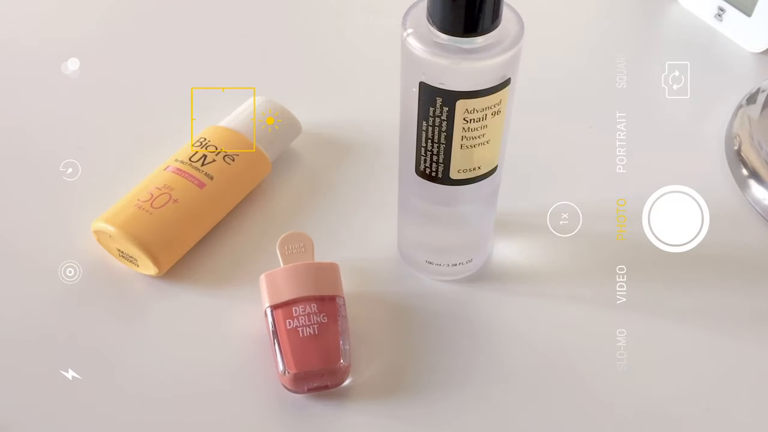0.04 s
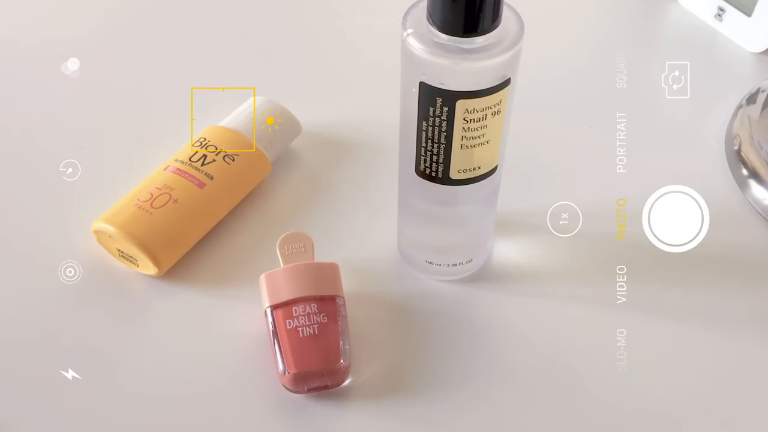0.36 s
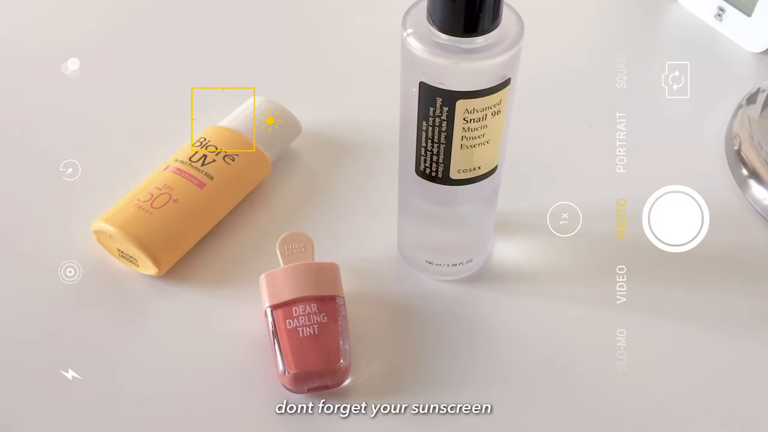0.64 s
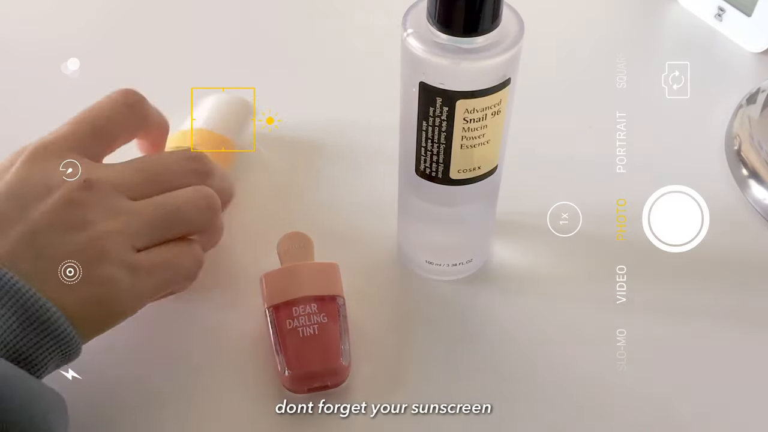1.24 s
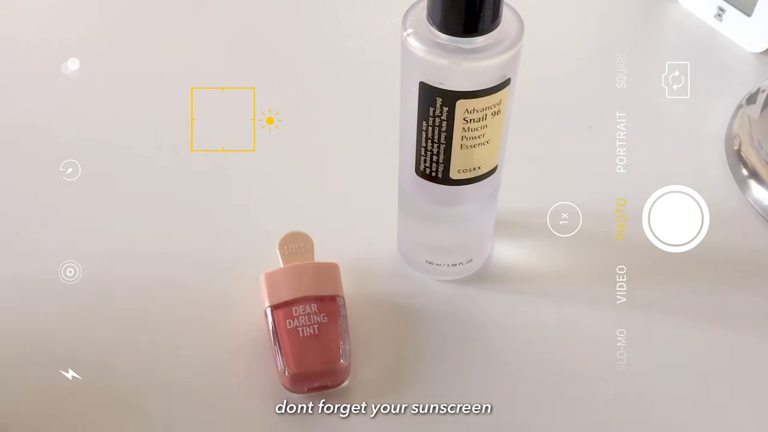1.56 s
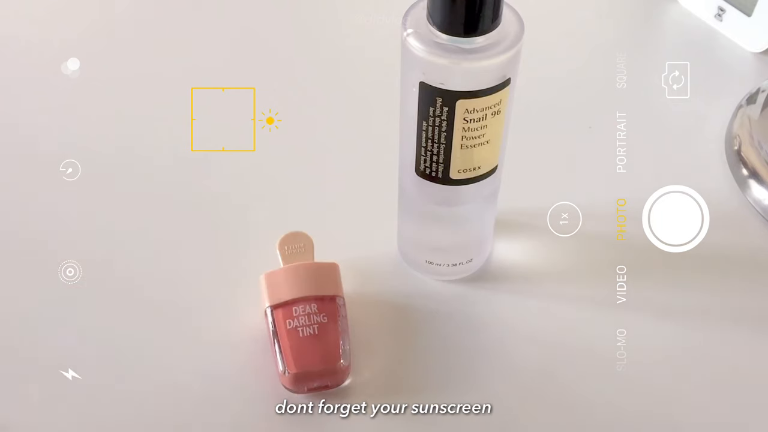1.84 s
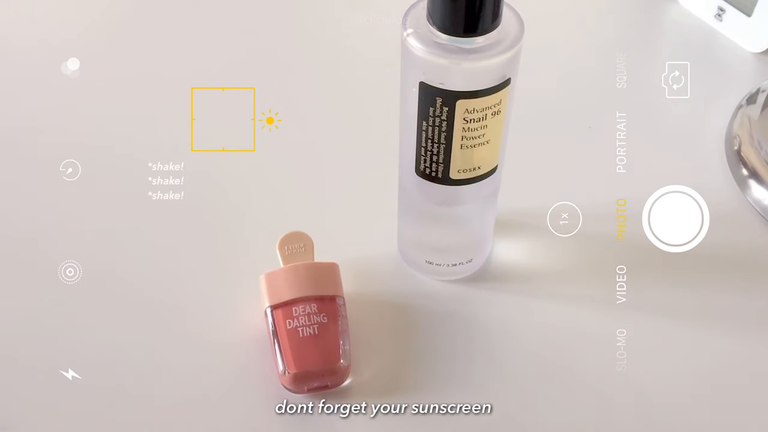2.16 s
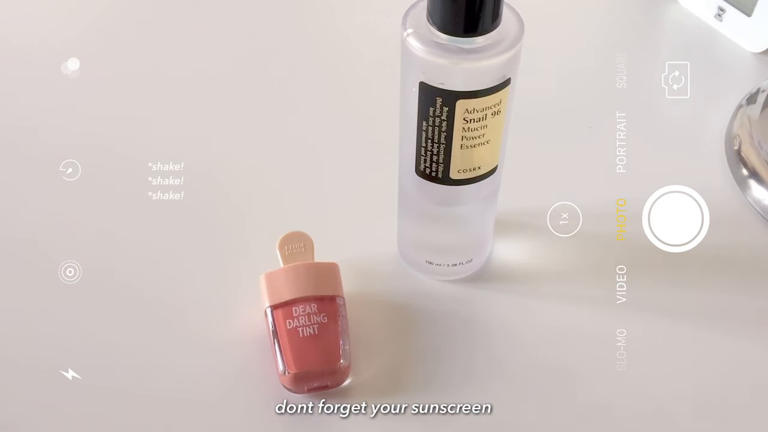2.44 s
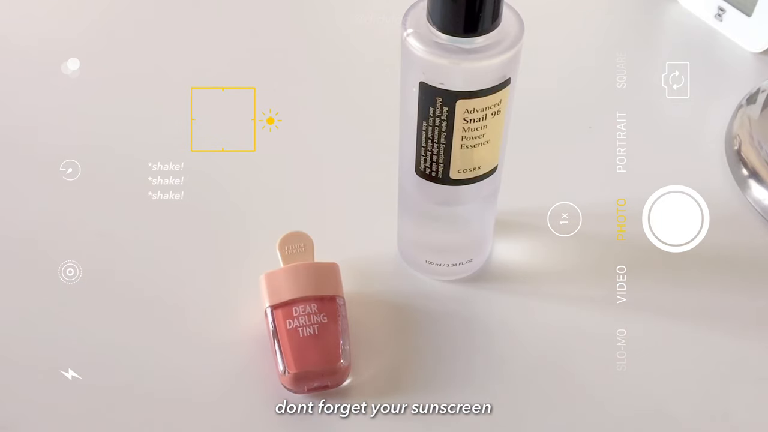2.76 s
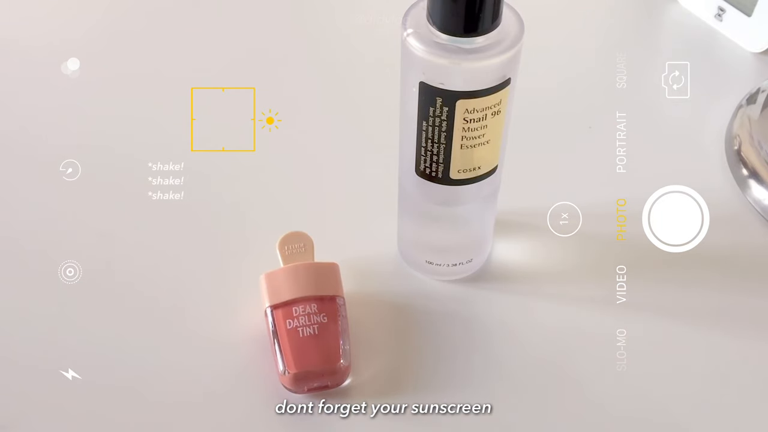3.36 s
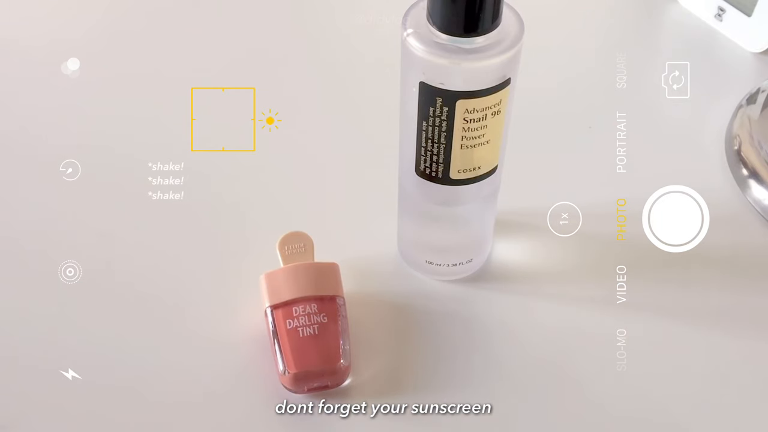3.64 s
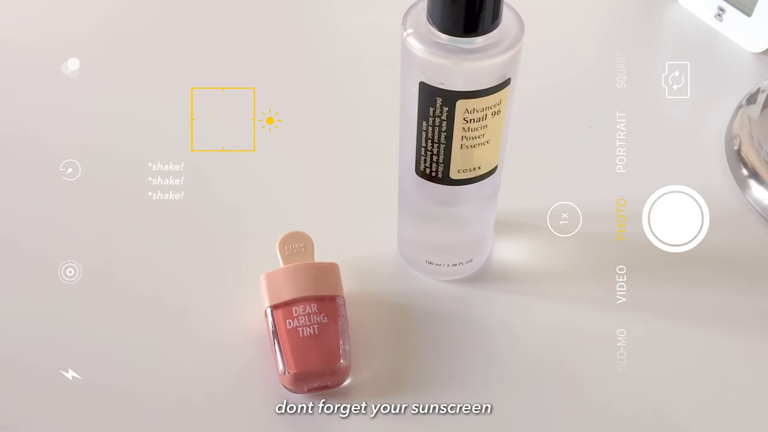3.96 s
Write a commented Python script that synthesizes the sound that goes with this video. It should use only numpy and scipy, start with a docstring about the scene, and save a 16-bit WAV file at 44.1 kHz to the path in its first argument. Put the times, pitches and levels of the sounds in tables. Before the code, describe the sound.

A mixing ball clicks sharply back and forth inside a shaken plastic lotion bottle, heard close in a small, quiet room. Soft cloth rustles and a light tabletop knock come first, and a faint low rumble rises behind the shaking.

```python
"""A small plastic bottle, shaken about five times a second after being lifted off a table.
A mixing ball inside strikes cap and base in turn and grazes the wall between; each blow
briefly rings the stiff shell. Lotion swishes, a sleeve rustles and the quiet room answers.
A wide low rumble fades in behind the shaking."""
import sys
import numpy as np
from scipy import signal
from scipy.fft import rfft, irfft
from scipy.io import wavfile
from scipy.ndimage import uniform_filter1d

SR = 44100
rng = np.random.default_rng(int(sys.argv[2]) if len(sys.argv) > 2 else 0)


def log_audio(samples):
    """Write samples as a 16-bit WAV file to the path given in sys.argv[1]."""
    # one column per channel
    frames = np.atleast_2d(samples).T
    # limit to full scale, then quantise
    limited = np.clip(frames, -1, 1)
    pcm = np.round(limited * 32767).astype(np.int16)
    wavfile.write(sys.argv[1], SR, pcm)


N = 176400


# Shell modes. Each row: frequency in Hz, t60 in seconds, cap-struck gain in dB, base-struck gain in dB.
SHELL_MODES = [(590, .014, -50, -34), (780, .01, -44, -36), (1010, .016, -35, -34), (1240, .024, -24, -22),
               (1680, .007, -20, -18), (1900, .008, -22, -29), (2150, .008, -26, -14),
               (2290, .008, -19, -20), (2680, .005, -10, -25), (3080, .006, -18, -25),
               (3430, .006, -28, -19), (4150, .004, -18, -23), (5400, .003, -15, -21),
               (8800, .002, -20, -19)]
# Contact crack spectrum. Each row: frequency in Hz, gain in dB.
CRACK_SPECTRUM = [(200, -8), (600, -16), (1500, -5), (3500, 0), (6500, 1), (9600, -1), (10400, -10),
                  (11400, -3), (13500, -8), (16000, -11)]

def shell_blow(end, detune=0.024, scatter_db=3.65, spread_s=0.00041, contact_s=0.0006):
    """One unit-energy blow: a crack plus short shell modes. end runs from 0 (cap) to 1 (base)."""
    t = np.arange(SR // 20) / SR
    hz, t60, cap_db, base_db = np.array(SHELL_MODES).T[:, :, None]
    pitch_draw, gain_draw = rng.standard_normal((2, len(SHELL_MODES), 1))
    age = np.maximum(t - spread_s * rng.random((len(SHELL_MODES), 1)), 0)
    gain = amp(cap_db + end * (base_db - cap_db) + scatter_db * gain_draw)
    ring = (gain * fade(age, t60) * np.sin(2 * np.pi * hz * (1 + detune * pitch_draw) * age)).sum(0)
    crack = amp(-21.5 + 6.5 * end) * noise(CRACK_SPECTRUM, len(t)) * fade(t, t60=0.0083)
    attack = 1 - np.exp(-t / contact_s)
    blow = np.pad((ring + crack) * attack, (SR // 1000, 0))
    # The small shell radiates little bass.
    blow = signal.sosfilt(signal.butter(2, 800, "highpass", fs=SR, output="sos"), blow)
    return blow / np.linalg.norm(blow)


# Ball strikes. Each row: start in seconds, level in dB, end (0 cap to 1 base), body in dB, treble in dB.
STRIKES = [(1.877, 4, 0.63, -1.5, 8.5), (2.0117, -1.5, 0.13, 5.3, 11), (2.1034, 7, 0.73, -8, 4),
           (2.2153, 9.9, 0.098, -4.2, -0.5), (2.3116, 8, 1, -6, -8), (2.428, 5.5, 0.16, -3.5, 5),
           (2.5154, 9, 1, -5, -7), (2.6267, 9.5, 0, -4.5, 0), (2.7067, 10, 0.74, -8, -7.2),
           (2.7957, 4, 0.36, -3.5, -9.5), (2.8202, 8, 0.61, -0.5, -7), (2.9118, 7.0, 1, 2.5, 2.5),
           (3.0258, 3.5, 0.19, -2.3, 4.5), (3.1142, 10, 0.42, -6.8, -2.5), (3.2298, 10, 0, -16.5, 0.5),
           (3.309, 7.5, 1, 1.5, -0.5), (3.429, 4.5, 0, -2.5, 4), (3.5168, 8, 0.74, -4, -4.2),
           (3.6294, 9.5, 0.16, -11, -0.8), (3.71, 8.5, 1, -2.8, -1.9), (3.8327, 9.5, 0.11, -7, 1),
           (3.91, 9, 1, 1.5, -3)]
# Room echo spectrum of a strike. Each row: frequency in Hz, gain in dB.
ECHO_SPECTRUM = [(150, -9), (400, -11.5), (600, -10.5), (1000, -8.5), (1250, 0), (1550, -3), (2300, 4),
                 (3000, 1), (4000, -3.5), (6500, -5), (9000, -11.5), (10500, -16.5), (12500, -18),
                 (16000, -34)]
# Lingering tones. Each row: frequency in Hz, t60 in seconds, cap gain in dB, base gain in dB.
LINGERING_TONES = [(1250, .4, -54, -48), (2270, .35, -56, -55)]

def ball_strikes(lead_s=0.00116, direct_db=3.0, echo_db=-36.5, body_hz=1500):
    """The ball hits cap and base in turn: a hard click, the room's echo, two faint lingering tones."""
    out, t = np.zeros(N), np.arange(SR // 3) / SR
    for start, db, end, body_db, treble_db in STRIKES:
        click = shell_blow(end)
        click = click + (amp(body_db) - 1) * lowpass(click, body_hz)
        add(out, start - lead_s, amp(db + direct_db) * treble_shelf(click, treble_db))
        tones = sum(amp(cap_db + end * (base_db - cap_db)) * fade(t, t60) * np.sin(2 * np.pi * hz * t)
                    for hz, t60, cap_db, base_db in LINGERING_TONES)
        echo = amp(echo_db) * treble_shelf(room_tail(ECHO_SPECTRUM), treble_db)
        add(out, start, amp(db) * (echo + tones))
    return out


# Wall grazes. Each row: start in seconds, level in dB, centre in Hz.
WALL_GRAZES = [(1.89, -5.5, 830), (1.988, -15, 1600), (2.037, -10, 1320), (2.066, -13.5, 1350),
               (2.192, -24, 805), (2.261, -20, 1600), (2.394, -13, 1050), (2.844, -5, 2830),
               (2.868, -10, 1600), (2.985, -16, 1330), (3.045, -18, 1200), (3.077, -5.5, 1580),
               (3.189, -15.5, 6240), (3.214, -18, 2380), (3.44, -0.5, 1470), (3.461, -12, 4640),
               (3.481, -9, 1500), (3.615, -22, 2200), (3.688, -20, 5000), (3.800, -5, 2110),
               (3.977, -36, 6000), (3.9985, -5.5, 1910)]

def ball_grazes(lead_s=0.001186, gain_db=3, broadband_db=-15):
    """Between strikes the ball touches the wall with small, narrower-band ticks."""
    out = np.zeros(N)
    for start, db, hz in WALL_GRAZES:
        blow = shell_blow(end=0.32)
        tick = bandpass(blow, hz, q=2.2) + amp(broadband_db) * blow
        add(out, start - lead_s, amp(db + gain_db) * room(tick / np.linalg.norm(tick)))
    return out


# Lotion spectrum. Each row: frequency in Hz, gain in dB.
LOTION_SPECTRUM = [(200, -1), (500, 2), (1300, -2), (2400, 0), (5000, 6), (9000, 0), (16000, -12)]

def lotion(t, start_s=1.94, rise_s=0.033, level_db=-52, wander_db=5.5):
    """Lotion swishes unevenly once the shaking is under way."""
    onset = np.clip((t - start_s) / rise_s, 0, 1)
    return amp(level_db + wander_db * wander(rate_hz=40)) * onset * noise(LOTION_SPECTRUM)


# Lift-off knocks. Each row: start in seconds, ring level in dB, tick level in dB.
LIFT_KNOCKS = [(1.392, -41, -30.5), (1.409, -35.5, -55)]
# Tabletop modes. Each row: frequency in Hz, t60 in seconds, gain in dB.
TABLE_MODES = [(148, 0.065, 2), (256, 0.19, -5), (306, 0.18, -6), (493, 0.039, -2), (657, 0.062, -7),
               (980, 0.04, -9.5), (1680, 0.067, -16)]

def table_knocks(tick_t60_s=0.0076):
    """The bottle knocks the table as it lifts: a tick and the ring of the tabletop."""
    out, t = np.zeros(N), np.arange(SR // 4) / SR
    for start, ring_db, tick_db in LIFT_KNOCKS:
        ring = sum(amp(db) * fade(t, t60) * np.sin(2 * np.pi * hz * t) * rng.choice([-1, 1])
                   for hz, t60, db in TABLE_MODES)
        tick = noise([(500, -10), (1500, 0.5), (4000, -9), (16000, -11.5)], len(t)) * fade(t, tick_t60_s)
        add(out, start, amp(ring_db) * ring + amp(tick_db) * tick)
    return out


# Scuffs. Each row: centre in seconds, half length in seconds, level in dB, resonance in Hz.
FINGER_SCUFFS = [(1.326, 0.0033, -46, 1110), (1.383, 0.019, -63, 1300), (1.785, 0.017, -55, 1640)]

def finger_scuffs(t, relative_bandwidth=0.22, hiss_db=-7):
    """Fingers rub the plastic: brief friction noise with one resonance."""
    out = np.zeros(N)
    for centre, half_length, db, hz in FINGER_SCUFFS:
        rub = noise([(300, 8), (1800, -11), (5000, -12), (16000, -24)])
        body = bandpass(rub, hz, q=1 / relative_bandwidth)
        out += amp(db) * swell(t, centre, half_length) * (body / body.std() + amp(hiss_db) * rub)
    return out


# Rustles. Each row: peak in seconds, rise in seconds, fall in seconds, level in dB.
SLEEVE_RUSTLES = [(0.175, 0.0016, 0.0032, -56), (0.437, 0.022, 0.036, -60), (.63, 0.043, 0.1, -70),
                  (0.841, 0.078, 0.022, -59), (1.255, .004, 0.0055, -67), (1.375, 0.059, 0.051, -54.5),
                  (1.785, 0.023, 0.013, -66), (1.79, .002, 0.002, -46)]
# Cloth spectrum. Each row: frequency in Hz, gain in dB.
CLOTH_SPECTRUM = [(1000, -14), (3000, -15), (5000, -12.5), (8000, -2.5), (10300, -9.5), (12500, -3),
                  (16000, -14)]

def sleeve(t, grain_db=4.0):
    """Cloth rustles in soft, grainy swells."""
    envelope = sum(amp(db) * np.exp(-((t - peak) / np.where(t < peak, rise, fall)) ** 2)
                   for peak, rise, fall, db in SLEEVE_RUSTLES)
    return envelope * amp(grain_db * wander(rate_hz=320)) * noise(CLOTH_SPECTRUM)


# Bumps. Each row: centre in seconds, half length in seconds, level in dB.
HANDLING_BUMPS = [(0.377, 0.021, -41), (0.68, 0.034, -50)]

def handling_bumps(t):
    """Handling makes two soft, low bumps."""
    envelope = sum(amp(db) * swell(t, centre, half_length) for centre, half_length, db in HANDLING_BUMPS)
    return envelope * noise([(20, -29), (60, 6), (130, -12), (300, -38), (1000, -60)])


# Room spectrum for the softer sounds. Each row: frequency in Hz, gain in dB.
ROOM_SPECTRUM = [(150, 24), (1200, 15.5), (2400, 19), (7000, -1.5), (16000, 18.5)]

def room(x, wet_db=-17.5):
    """Direct sound plus the room's answer."""
    tail = room_tail(ROOM_SPECTRUM)
    direct = np.arange(len(tail)) == 0
    return signal.fftconvolve(x, direct + amp(wet_db) * tail / np.linalg.norm(tail))


def room_tail(spectrum, low_t60_s=0.27, treble_t60_s=0.18, delay_s=0.004, build_s=0.0042):
    """Diffuse decay of a small room; the treble dies sooner."""
    t = np.arange(SR // 3) / SR
    diffuse = noise(spectrum, len(t))
    low = lowpass(diffuse, 2600)
    build = 1 - np.exp(-np.maximum(t - delay_s, 0) / build_s)
    return build * (low * fade(t, low_t60_s) + (diffuse - low) * fade(t, treble_t60_s))


# Rumble envelope. Each row: time in seconds, level in dB.
RUMBLE_ENVELOPE = [(1.7, -105), (1.82, -54), (2.1, -45), (2.3, -43), (2.6, -46), (3.0, -41.5), (3.5, -40),
                   (3.95, -38.5)]
# Rumble spectra, mid and side. Each row: frequency in Hz, gain in dB.
RUMBLE_MID_SPECTRUM = [(15, -3), (33, 0.5), (60, 1), (110, -8), (200, -15), (400, -31), (1000, -20),
                       (4000, -45), (16000, -52)]
RUMBLE_SIDE_SPECTRUM = [(20, -16), (60, -2.5), (130, 2.5), (250, -4.5), (500, -9.5), (1000, -12),
                        (4000, -25), (8000, -24), (16000, -45)]
# Squeals. Each row: centre in seconds, half length in seconds, level in dB.
HIGH_SQUEALS = [(2.38, 0.033, -64), (3.286, .035, -48)]

def rumble(t, side_db=-15.5, squeal_hz=12750):
    """A wide rumble with a little hiss fades in, carrying two faint high squeals."""
    mid = noise(RUMBLE_MID_SPECTRUM)
    side = amp(side_db) * noise(RUMBLE_SIDE_SPECTRUM)
    envelope = amp(np.interp(t, *np.array(RUMBLE_ENVELOPE).T))
    whistle = bandpass(rng.standard_normal((2, N)), squeal_hz, q=30)
    whistle = bandpass(whistle, squeal_hz, q=30)
    swells = sum(amp(db) * swell(t, centre, half_length) for centre, half_length, db in HIGH_SQUEALS)
    return envelope * np.array([mid + side, mid - side]) + swells * whistle / whistle.std()


# Quiet room spectrum. Each row: frequency in Hz, gain in dB.
FLOOR_SPECTRUM = [(20, -24), (40, -4), (70, -9.5), (130, -1), (180, -2.5), (300, -13), (470, -27),
                  (900, -26.5), (1300, -29), (2700, -35.5), (6000, -38.5), (16000, -45)]

def room_noise(level_db=-54, wander_db=0.4):
    """Quiet room noise with slightly wavering bass."""
    air = noise(FLOOR_SPECTRUM)
    waver = wander_db * np.log(10) / 20 * wander(rate_hz=12)
    return amp(level_db) * (air + waver * lowpass(air, 280))


def amp(db):
    """Decibels to gain."""
    return 10 ** (np.asarray(db) / 20)


def fade(t, t60):
    """Exponential decay, 60 dB down at t60."""
    return np.exp(-np.log(1000) * np.maximum(t, 0) / t60)


def swell(t, centre_s, half_length_s):
    """Gaussian rise and fall."""
    return np.exp(-.5 * ((t - centre_s) / half_length_s) ** 2)


def wander(rate_hz):
    """Smooth random drift, spread near 1."""
    hold = int(SR / rate_hz)
    steps = np.repeat(rng.standard_normal(N // hold + 1), hold)
    return uniform_filter1d(steps, hold)[:N]


def noise(spectrum, size=N):
    """Unit-rms noise shaped by (Hz, dB) points."""
    hz, db = np.array(spectrum, float).T
    bin_hz = np.maximum(np.fft.rfftfreq(size, 1 / SR), 1)
    gain = amp(np.interp(np.log(bin_hz), np.log(hz), db))
    x = irfft(rfft(rng.standard_normal(size)) * gain, size)
    return x / x.std()


def lowpass(x, hz):
    """Gentle zero-phase low-pass."""
    return signal.sosfiltfilt(signal.butter(2, hz, fs=SR, output="sos"), x, padtype=None)


def bandpass(x, hz, q):
    """One resonance, unity gain at centre."""
    return signal.lfilter(*signal.iirpeak(hz, q, fs=SR), x)


def treble_shelf(x, db, corner_hz=3500):
    """Raise or lower the treble."""
    return x + (amp(db) - 1) * (x - lowpass(x, corner_hz))


def add(out, start_s, x):
    """Mix x into out at start_s."""
    i = int(start_s * SR)
    out[i:i + len(x)] += x[:max(N - i, 0)]


def scene():
    """Bottle and hand are centred and close; only the rumble and its squeals are wide."""
    t = np.arange(N) / SR
    ball = ball_strikes() + ball_grazes()
    soft_sounds = table_knocks() + finger_scuffs(t) + sleeve(t) + lotion(t)
    return ball + room(soft_sounds)[:N] + room_noise() + handling_bumps(t) + rumble(t)


def record(dry, top_hz=16200):
    """Soft-clip the tallest peaks, then low-pass steeply."""
    rounded = dry / (1 + dry ** 6) ** (1 / 6)
    return signal.sosfilt(signal.ellip(8, .2, 70, top_hz, fs=SR, output="sos"), rounded)


dry = scene()
out = record(dry)
log_audio(out)
```